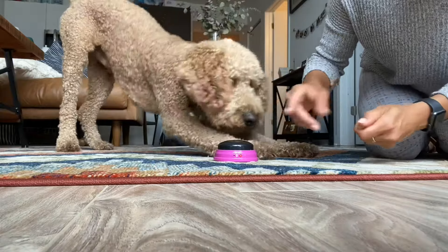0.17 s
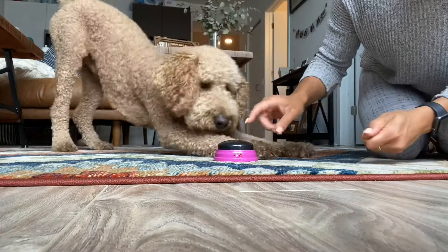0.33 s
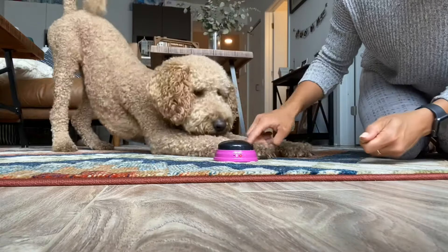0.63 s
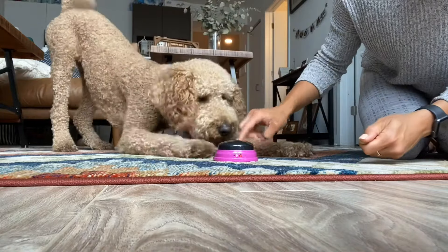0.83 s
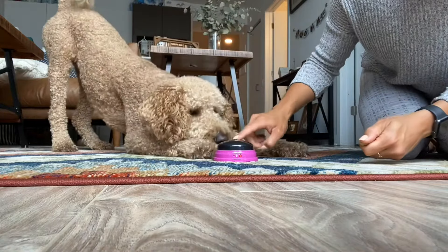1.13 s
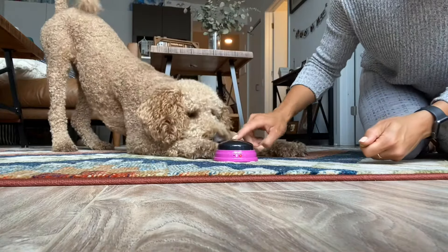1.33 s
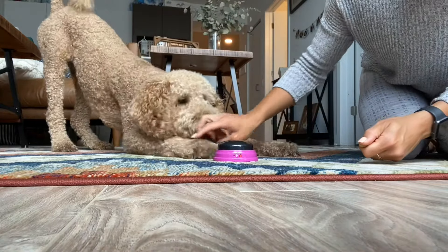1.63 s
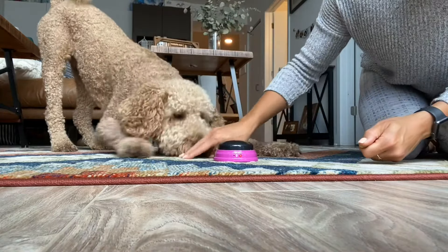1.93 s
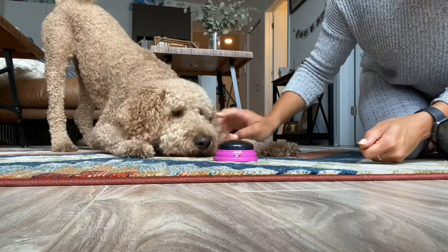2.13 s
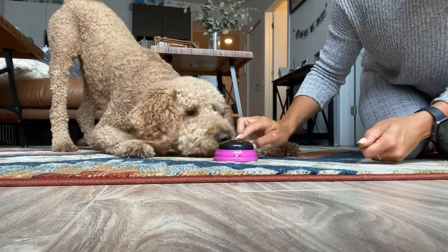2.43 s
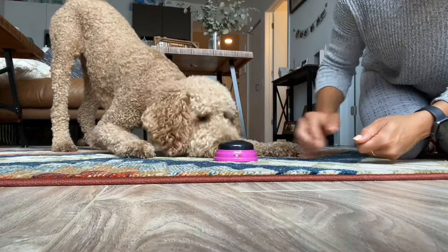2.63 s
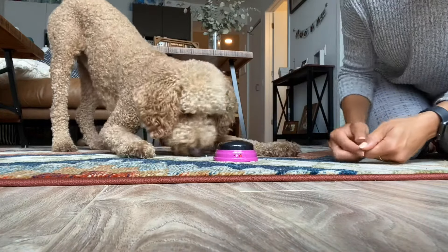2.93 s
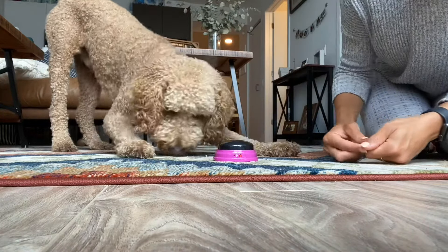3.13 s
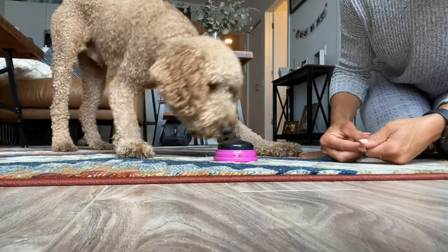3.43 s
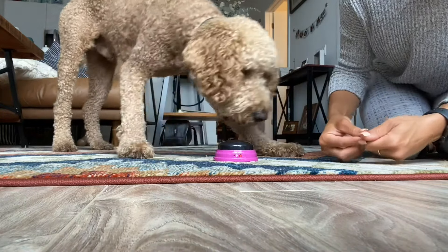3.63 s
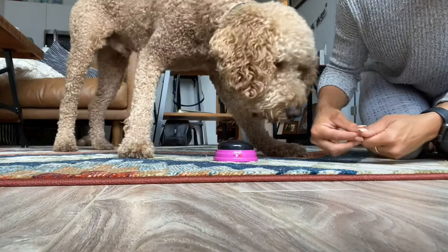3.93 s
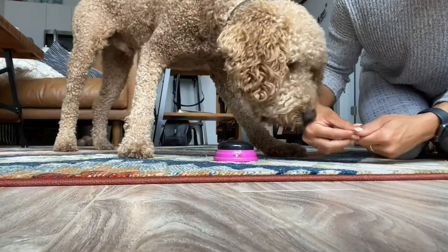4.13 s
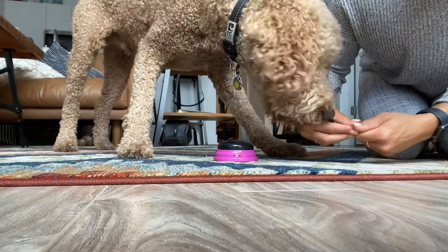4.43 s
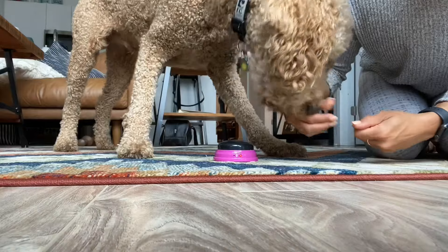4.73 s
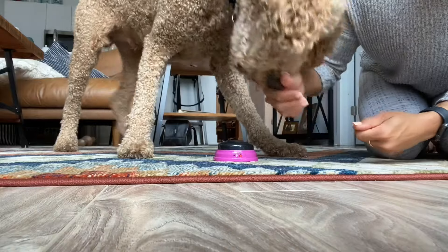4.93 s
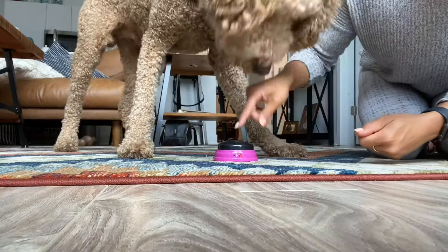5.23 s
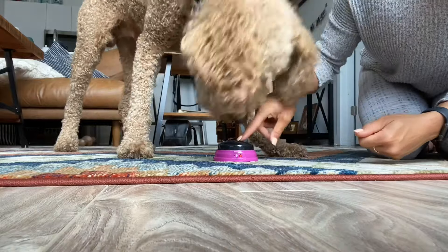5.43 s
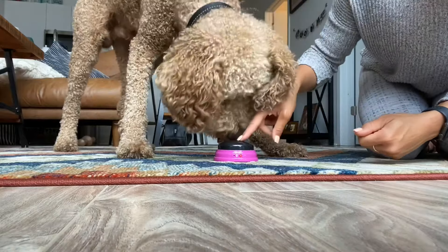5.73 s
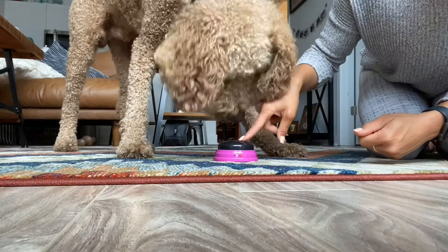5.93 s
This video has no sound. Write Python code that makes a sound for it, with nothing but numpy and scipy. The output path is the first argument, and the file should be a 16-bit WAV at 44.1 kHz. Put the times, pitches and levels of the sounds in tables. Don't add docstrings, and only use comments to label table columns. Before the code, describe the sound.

Low motor hum and soft air hiss run throughout a small furnished room. Near the floor microphone come short rug rubs, dry claw ticks and thin high tinkles of metal dog tags. After a longer hand stroke on the rug, fingers snap once, sharp and loud with a short room tail. The tags then jingle busily, grow sparse, and a quieter nail tap comes late.

```python
import sys
import numpy as np
from scipy import signal
from scipy.fft import rfft, irfft, next_fast_len
from scipy.io import wavfile
from scipy.ndimage import uniform_filter1d, map_coordinates

SR = 44100
rng = np.random.default_rng(int(sys.argv[2]) if len(sys.argv) > 2 else 0)


def elevation(decibels):
    levels = np.asarray(decibels, float)
    return 10 ** (levels / 20)


def dump_mix(stems):
    frames = np.atleast_2d(stems).T
    limited = np.clip(frames, -1, 1)
    pcm = np.round(limited * 32767).astype(np.int16)
    wavfile.write(sys.argv[1], SR, pcm)


N = 268569
LEFT_RIGHT = np.array([[1], [-1]])


def unit(x):
    return x / np.sqrt(np.mean(x ** 2) + 1e-20)


def along(points, hz, order=1):
    table = np.array(points, float)
    return np.interp(np.log(hz + 1), np.log(table[:, 0] + 1), table[:, order])


def filtered(x, response):
    size = next_fast_len(x.shape[-1] + 8192)
    spectrum = rfft(x, size) * response(np.fft.rfftfreq(size, 1 / SR))
    return irfft(spectrum, size)[..., :x.shape[-1]]


def wobble(rate, size=N):
    at = np.arange(0, N + 64, 64)
    knots = rng.standard_normal(int(N * rate / SR) + 4)
    slow = map_coordinates(knots, [at * rate / SR])
    return np.interp(np.arange(size) * N / size, at, slow)


def sides(db):
    return elevation(np.array([db / 2, -db / 2]))


def add(out, start_s, x):
    part = out[:, round(start_s * SR):][:, :x.shape[-1]]
    part += x[..., :part.shape[1]]


SHAFT_HZ = 11.391
# (multiple [turns], left level [dB], right level [dB], left leads by [radians])
SHAFT_TONES = [(2, -81, -82, 0.1), (4, -71, -70, 0.4), (5, -63, -70, -2.4), (6, -64, -67, 0.5),
               (7, -56, -59, 1.9), (8, -59, -65, -0.2), (9, -59, -64, 0.2), (10, -73, -71, 0.0),
               (11, -51, -50, 0.3), (13, -64, -68, 0.2), (14, -57, -64, 0.4), (15, -52, -61, -0.1),
               (16, -59, -62, -0.1), (17, -53, -53, 0.1), (18, -62, -63, 0.0), (19, -68, -67, -0.3),
               (20, -62, -58, 0.7), (21, -59, -65, -0.5), (22, -70, -71, -0.3), (23, -74, -67, -0.3),
               (24, -64, -60, 0.2), (25, -59, -57, -0.0), (26, -65, -70, -0.1), (27, -62, -60, 0.4),
               (29, -67, -65, -0.1), (30, -73, -71, 0.0), (33, -67, -67, 0.3), (35, -68, -62, 0.3),
               (39, -69, -70, 0.7)]
# (frequency [Hz], left level [dB], right level [dB], left leads by [radians])
MOTOR_TONES = [(35.5, -80, -80, 0.1), (58.8, -64, -67, 0.3), (96.7, -64, -69, 0.3), (120, -68, -65, -0.2),
               (188, -63, -64, -0.1), (222.5, -65, -63, 0.3), (240.1, -56, -61, -0.5), (480, -80, -71, 0.2),
               (502.8, -76, -68, 1.1), (508.7, -82, -68, 0.3), (548.4, -70, -78, -1.7),
               (571.3, -64, -57, -2.0), (600, -73, -68, 1.5), (628.6, -62, -62, 1.9),
               (640.1, -80, -72, 2.6), (691.5, -77, -73, 2.1), (748.8, -73, -79, 2.5),
               (1454.2, -82, -87, -0.2)]


def appliance():
    step = 8
    t = np.arange(0, N, step) / SR
    out = np.zeros((2, len(t)))
    shaft = [(round(multiple) * SHAFT_HZ, *rest) for multiple, *rest in SHAFT_TONES]
    for hz, left_db, right_db, lead in shaft + MOTOR_TONES:
        phase = rng.uniform(0, 2 * np.pi) + lead / 2 * LEFT_RIGHT
        sway = elevation(0.48 * wobble(1.36, size=len(t)))
        level = np.sqrt(2) * elevation(np.array([[left_db], [right_db]]))
        out += level * sway * np.sin(2 * np.pi * hz * t + phase)
    return signal.resample_poly(out, step, 1, axis=1)[:, :N]


# (frequency [Hz], likeness [-1 to 1], left minus right [dB])
PORT_LIKENESS = [(43, 0.069, 14), (99, 0.98, 1.5), (139, 0.8, 4.5), (231, 0.86, -0.5), (345, 0.32, -3.5),
                 (477, 0.36, 0), (666, -0.21, 2), (820, 0.097, 1), (1320, 0.75, 0.5), (1910, -0.58, 1),
                 (2530, 1, 1), (3170, -0.22, 0.5), (4800, 0.5, 1), (6100, 0.14, -1), (7200, 0.65, -0.5),
                 (14400, 0.99, -2.5)]
# (frequency [Hz], width [Hz],
# level over the noise [dB])
DUCT_WHISTLES = [(992, 9.9, 8), (1572, 17, 6), (2823, 18, 10.5), (3357, 42, 7.5), (4650, 23, 9),
                 (7680, 75, 1), (13020, 330, -21)]


def air(spectrum):
    def peaks_db(hz):
        return sum(db / (1 + (2 * (hz - centre_hz) / width) ** 2)
                   for centre_hz, width, db in DUCT_WHISTLES)

    def gain(hz):
        level = elevation(along(spectrum, hz) + peaks_db(hz)) * np.sqrt(SR / 2)
        angle = np.arccos(np.clip(along(PORT_LIKENESS, hz), -1, 1)) / 2
        return level * [np.cos(angle), np.sin(angle)]

    mid, side = filtered(rng.standard_normal((2, N)), gain)
    pair = np.array([mid + side, mid - side])
    return filtered(pair, lambda hz: sides(along(PORT_LIKENESS, hz, order=2)))


# (frequency [Hz], level [dB per Hz])
RUMBLE_LEVEL = [(20, -85), (38, -98), (52, -81.5), (72, -73), (105, -80), (133, -77), (185, -72.5),
                (260, -76), (350, -77), (460, -80), (570, -79.5), (680, -84.5), (1000, -90), (1700, -101),
                (3500, -116)]
# (frequency [Hz], level [dB per Hz])
HISS_LEVEL = [(500, -120), (1500, -108), (2500, -110), (4000, -111), (6000, -111), (7800, -109),
              (8600, -111), (10000, -113), (12000, -122), (13000, -120), (14000, -123), (15300, -120.5),
              (16000, -123)]
# (time [s], level [dB])
DRAUGHT_LEVEL = [(0, 1.5), (.6, 4), (1.2, 0), (2, 2), (2.9, 2), (3.6, -1), (4.6, -1), (5.5, -0.2),
                 (6.1, -2.5)]


def moving_air():
    rumble = air(RUMBLE_LEVEL) * elevation(0.84 * wobble(2.935))
    hiss = air(HISS_LEVEL) * elevation(0.45 * wobble(6.8))
    flow = rumble + hiss
    middle = filtered(flow, lambda hz: 1 / (1 + (hz / 1000.0 - 3300.0 / (hz + 1)) ** 2 / 3))
    times, levels_db = np.transpose(DRAUGHT_LEVEL)
    draught = elevation(np.interp(np.arange(N) / SR, times, levels_db)) - 1
    return flow + draught * middle


def coat_rustle():
    settle_db, settle_s = -70, 0.21
    out, t = np.zeros((2, N)), np.arange(SR // 2) / SR
    bright = lambda hz: (hz / 15000.) ** 2 * hz ** 8 / (hz ** 8 + 8200.0 ** 8)
    coat = unit(filtered(rng.standard_normal((2, len(t))), bright))
    add(out, 0, coat * elevation(settle_db - 300 * np.maximum(t - settle_s, 0)))
    return out


# (frequency [Hz], level [dB per Hz])
RUG_COLOUR = [(400, -14), (900, 7), (2000, 4), (3000, -2), (4500, -10.5), (5500, -43), (9000, -57),
              (16000, -46)]
# (time [s], length [s], level [dB], bright rasp over the body [dB], left leads by [ms])
RUG_STROKES = [
    (0.002, 0.0097, -65.5, -6, 0.044),
    (0.155, 0.12, -70, -6, 0.033),
    (0.687, 0.031, -63, -10, 0.028),
    (0.728, 0.04, -59, -5.5, 0.028),
    (0.873, 0.056, -82, 10, 0.021),
    (1.077, 0.13, -71.5, -26, 0.032),
    (1.646, 0.29, -64.5, -10, 0.081),
    (1.792, 0.12, -64.5, -17, 0.081),
    (1.886, 0.015, -65, -22, 0.08),
]
SWELL_DB = 2.5
TOUCH_DB_PER_S, LIFT_DB_PER_S = 282, 400


def brushing():
    out, t = np.zeros((2, N)), np.arange(SR // 2) / SR - .08
    for start_s, length, db, rasp_db, lead_ms in RUG_STROKES:
        press_db = db - SWELL_DB * np.clip(1 - t / length, 0, 1)
        press_db += TOUCH_DB_PER_S * np.minimum(t, 0)
        press_db -= LIFT_DB_PER_S * np.maximum(t - length, 0)
        fibres = rng.standard_normal((2, 3, len(t))) * elevation(0.91 * wobble(93.0)[:len(t)])
        pair = fibres[:, 2:] + 0.31 * fibres[:, :2]

        def shift(hz):
            return np.exp(1j * np.pi * hz * lead_ms / 1000 * LEFT_RIGHT)

        def body_gain(hz):
            bump_db = 2.4 / (1 + ((hz - 2900.) / 500.0) ** 2)
            return elevation(along(RUG_COLOUR, hz) + bump_db) * shift(hz)

        body = unit(filtered(pair[0], body_gain))
        rasp = unit(filtered(pair[1], lambda hz: shift(hz) / (1 + ((hz - 4300.) / 830.0) ** 2)))
        stroke = elevation(press_db) * (body + elevation(rasp_db) * rasp)
        heard = start_s + t >= 0
        add(out, start_s + t[heard][0], stroke[:, heard])
    return out


# (time [s], peak level [dB])
RUG_TICKS = [
    (0.008, -50),
    (0.167, -53),
    (0.27, -52),
    (2.66, -62),
    (3.308, -62),
    (5.62, -67),
]


def ticks():
    out, t = np.zeros((2, N)), np.arange(512) / SR
    for start_s, db in RUG_TICKS:
        tick = elevation(db - 60 * t / .004) * rng.standard_normal(512)
        add(out, start_s, filtered(tick, lambda hz: 1j * hz / (2000. + 1j * hz)))
    return out


# (frequency [Hz], time to fade by 60 dB [s], level [dB])
ROOM_FADE = [(500, 0.2, 10), (2450, 0.099, -6), (4000, 0.33, 1.5), (6140, 0.42, -1), (9200, 0.39, -5),
             (10300, 0.22, -11), (11800, .3, -7), (14900, 0.43, -15)]


def room(x, alike):
    hz, t, z = signal.stft(rng.standard_normal((3, SR // 2)), SR, nperseg=256)
    fade_db = 60 * t / along(ROOM_FADE, hz)[:, None]
    gain = elevation(along(ROOM_FADE, hz, order=2)[:, None] - fade_db)
    tail = signal.istft(z * gain, SR, nperseg=256)[1]
    tail = alike * tail[2] + np.sqrt(1 - alike ** 2) * tail[:2]
    tail = tail / np.linalg.norm(tail[0])
    return signal.fftconvolve(np.pad(x, (200, 0))[None], tail, axes=1)


# (frequency [Hz], level [dB], time to fade by 60 dB [s])
TAG_TONES = [(7600, -4, 0.091), (9010, -9, .15), (12600, -12, .1), (12600, -7, .1), (12900, 0, 0.38),
             (12960, -5.5, 0.27), (13600, 0, .1), (14800, 1, 0.27), (14700, 4, 0.49)]
# (time [s], peak level [dB], click level [dB], ring [0-1])
BIG_TAG_HITS = [
    (0.0954, -70, -11, 0.6),
    (2.533, -58, -9, 0.6),
    (2.583, -63, -5, 0.55),
    (3.4024, -64, -8, 0.8),
    (3.5085, -53.5, -22, 0.17),
    (3.617, -62, -17, 0.4),
    (3.8477, -68, -17, 0.6),
]
# (time [s], peak level [dB], click level [dB], ring [0-1])
MIDDLE_TAG_HITS = [(0.063, -69, 4, 0.5), (0.4888, -70, -16, 0.6), (0.7766, -55, -25, 0.3),
                   (0.7854, -72, -10, 0.5), (0.8804, -57, -28, 0.24), (1.482, -77, -16, 0.6),
                   (1.9694, -58, -23, 0.66), (2.5215, -42.5, -24, 0.58), (2.5655, -50, -10, 0.22),
                   (2.7634, -57.5, -21, 0.83), (2.79, -62, -19, .6), (2.9482, -58, -20, 0.3),
                   (2.969, -49, -20, 0.3), (3.0894, -56, -7, 0.3), (3.0999, -52, -24, 0.7),
                   (3.265, -51, -14, 0.65), (3.3752, -65, -20, .4), (3.3872, -63, -20, .4),
                   (3.692, -52.5, -38, 0.22), (4.0796, -79, -14, 0.55), (4.4862, -71, -16, 0.6),
                   (4.5296, -56, -29, 0.17), (4.757, -57, -22, 0.31), (5.2834, -57, -19, 0.4)]
# (time [s], peak level [dB], click level [dB], ring [0-1])
SMALL_TAG_HITS = [
    (0.057, -66, -7, 0.45),
    (0.258, -53, -25, 0.05),
    (1.6282, -57, -23, 0.52),
    (2.9276, -55.5, -22, 0.6),
    (2.785, -63, -25, .8),
    (3.091, -60, -20, .7),
    (3.268, -57, -22, .9),
    (3.4674, -61, -30, 0.6),
]
# (low tones [dB], top tones [dB])
BUNCH_SHAKES = [
    (9.5, -16),
    (-19, -20),
    (-6, -3),
]


def tags():
    near, t = np.zeros((1, N)), np.arange(SR // 4) / SR
    hz, level_db, t60 = np.transpose(TAG_TONES)[..., None]
    bunch = zip((BIG_TAG_HITS, MIDDLE_TAG_HITS, SMALL_TAG_HITS), BUNCH_SHAKES)
    hits = [(*hit, *shake) for tag, shake in bunch for hit in tag]
    for start_s, db, click_db, ring, low_db, top_db in hits:
        part_db = np.where(hz < 10000, low_db + 4.5, np.where(hz > 14000, top_db, 0))
        part_db = part_db + rng.normal(0, 1.9, hz.shape)
        flutter = np.cumsum(rng.normal(0, 0.076, (len(hz), len(t))), axis=1)
        ring_s = t60 * max(ring, .05) ** np.where(hz > 14000, .6, 1)
        tone = elevation(level_db + part_db - 60 * t / ring_s) * np.sin(2 * np.pi * hz * t + flutter)
        click = elevation(click_db + 26.5 - 60 * t / 0.011) * rng.standard_normal(len(t))
        click = np.diff(click, prepend=0)
        click = filtered(click, lambda f: f ** 4 / (f ** 4 + 4400.0 ** 4))
        add(near, start_s, elevation(db - 10.5) * (tone.sum(axis=0) + click))
    both = near + elevation(-4.0) * room(near[0], alike=0.53)[:, :N]
    return filtered(both, lambda f: np.exp(-1j * np.pi * f * 7e-6 * LEFT_RIGHT))


# (time [s], peak level [dB], length [s], left minus right [dB], room level [dB])
FINGER_HITS = [
    (2.213, -16.5, 0.0024, 3, -13.5),
    (5.347, -34, 0.0029, 3.5, -18),
    (5.3503, -43, 0.002, -1, -15),
]
# (frequency [Hz], width [Hz], level [dB])
HAND_MODES = [
    [(710, 64, 6.5), (1135, 160, -1.5), (1456, 93, 0), (2160, 140, 3.5), (4280, 470, 3), (6060, 620, 4),
     (6700, 330, 5.5), (7850, 470, 0), (8370, 210, 5), (9610, 500, 2), (11500, 840, -1), (13350, 390, 5),
     (16240, 500, 5)],
    [(1490, 160, -1), (2320, 220, -1), (4540, 500, 3), (7100, 560, -5), (8250, 320, -7), (9750, 400, -3),
     (11600, 400, -15), (13450, 570, -11), (15500, 500, -16)],
]
WALL_S, WALL_DB = 0.015, -19


def snaps():
    out, t = np.zeros((2, N)), np.arange(4096) / SR
    modes_of_hits = HAND_MODES + HAND_MODES[1:]
    for (start_s, db, length, pan_db, room_db), modes in zip(FINGER_HITS, modes_of_hits):
        fall = elevation(-30 * (t / length) ** 2) + elevation(-14.0 - 60 * t / 0.026)
        shape = (1 - np.exp(-t / 0.00033)) * fall
        slips = rng.standard_normal(len(t))
        for _ in range(20):
            z = rfft(slips * (shape / (uniform_filter1d(abs(slips), size=24) + 1e-9)))
            slips = irfft(z / abs(z))
        slips[len(t) // 4:] = 0

        def hand(f, wider=1):
            return sum((-1) ** k * elevation(mode_db) * 1j * f * width
                       / (centre * centre - f * f + 1j * f * width * wider)
                       for k, (centre, width, mode_db) in enumerate(modes))

        burst = filtered(slips, hand)
        gain = elevation(db) / abs(burst).max()
        burst = gain * burst
        spread = gain * filtered(slips, lambda f: 2.1 * hand(f, wider=2.03))
        echo = filtered(burst, lambda f: f ** 2 / (f ** 2 + 3000. ** 2))
        add(out, start_s, sides(pan_db)[:, None] * burst)
        add(out, start_s + WALL_S, elevation(WALL_DB) * echo)
        add(out, start_s, elevation(room_db) * room(spread, alike=0.73))
    return out


def scene():
    background = appliance() + moving_air()
    on_the_rug = coat_rustle() + brushing() + ticks()
    return background + on_the_rug + tags() + snaps()


def roll_off(x):
    return signal.sosfilt(signal.butter(12, 16300, fs=SR, output="sos"), x)


# (frequency [Hz], left leads by [radians])
PORT_TURN = [(0, 0), (1000, -.4), (2000, -1), (4000, -2.2), (5600, -2.9), (6600, -1.8), (7600, -.2),
             (8500, .4), (9800, 2.8), (10800, 3.5), (12100, 5.9), (13600, 6.7), (14800, 8.8), (15800, 9.9)]


def record(dry):
    top_hz = 16200.
    turn_hz, turn = np.transpose(PORT_TURN)

    def ports(hz):
        edge = 1 / (1 + (hz / top_hz) ** 60)
        return edge * np.exp(.5j * np.interp(hz, turn_hz, turn) * LEFT_RIGHT)

    mix = filtered(dry, ports)
    return roll_off(mix)


dry = scene()
out = record(dry)
dump_mix(out)
```